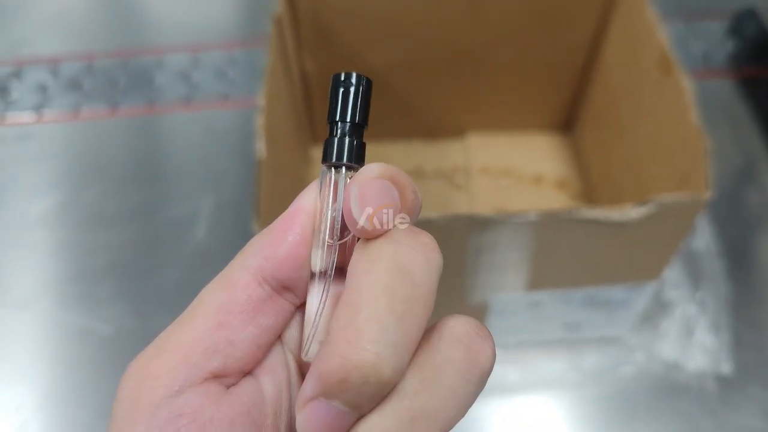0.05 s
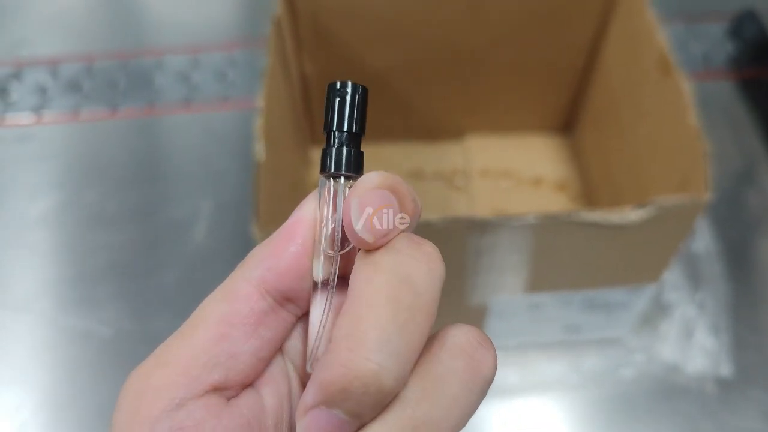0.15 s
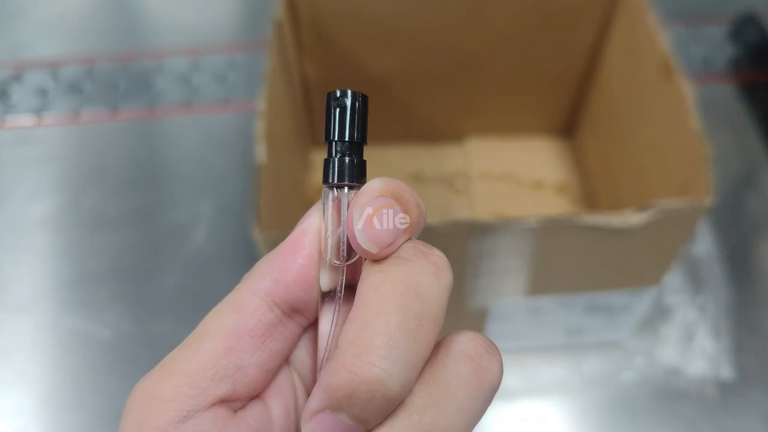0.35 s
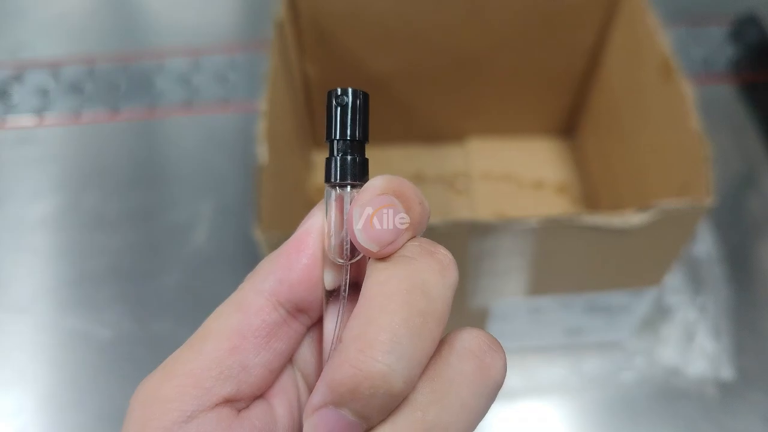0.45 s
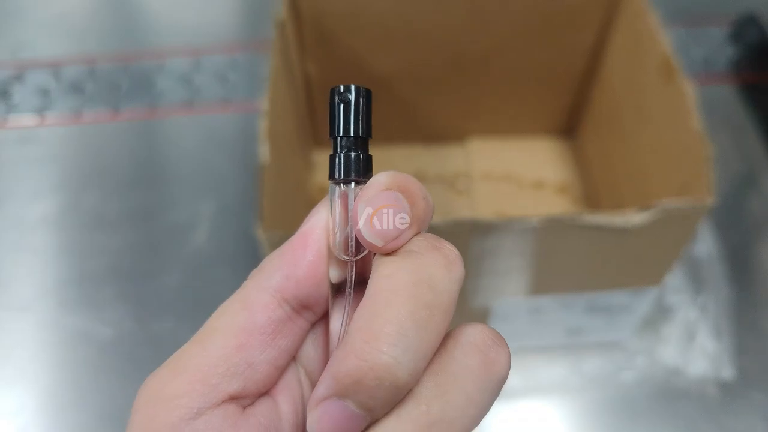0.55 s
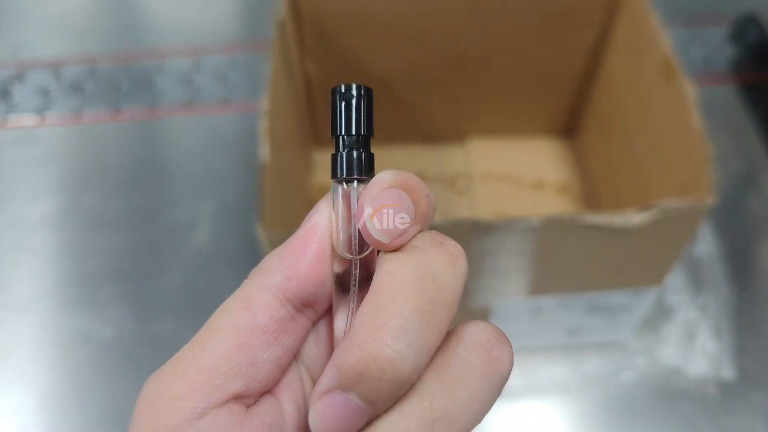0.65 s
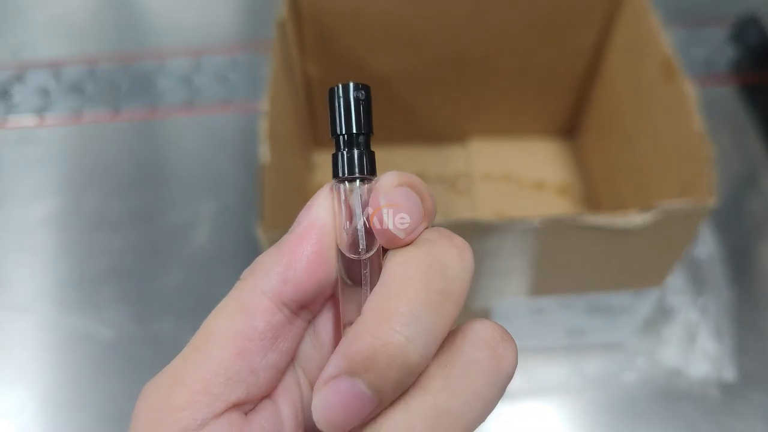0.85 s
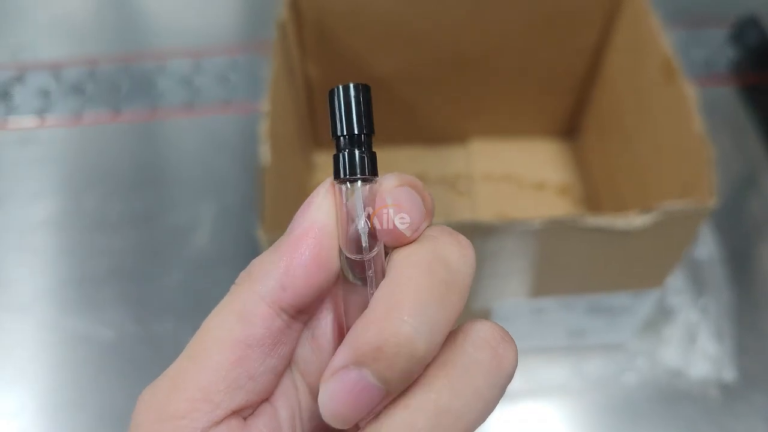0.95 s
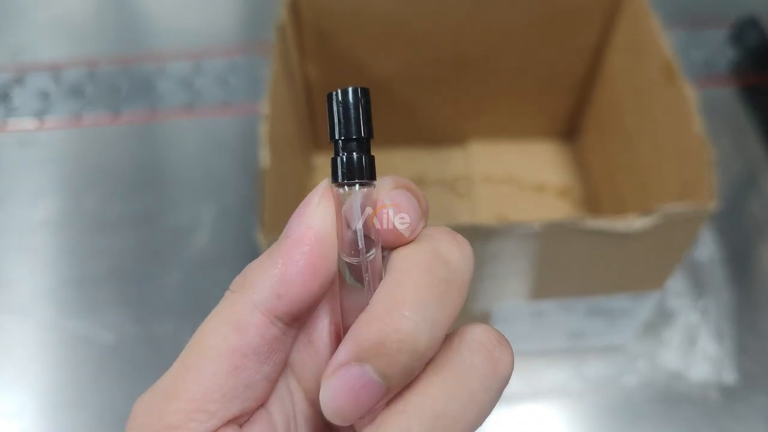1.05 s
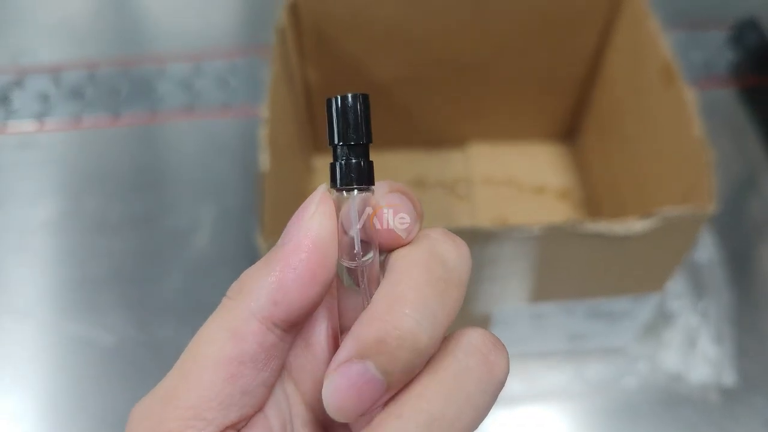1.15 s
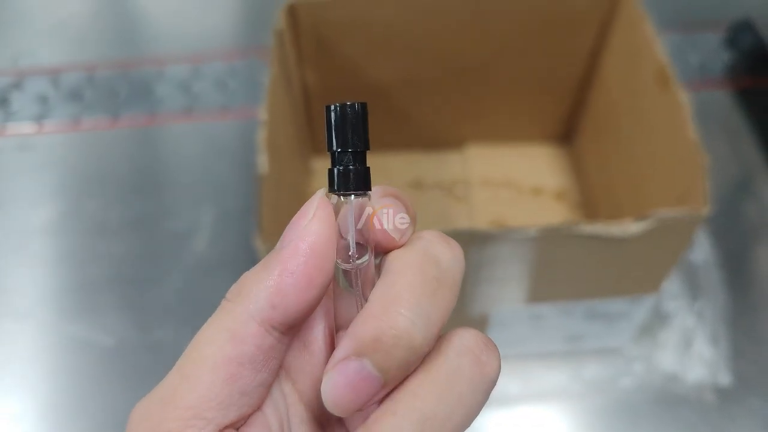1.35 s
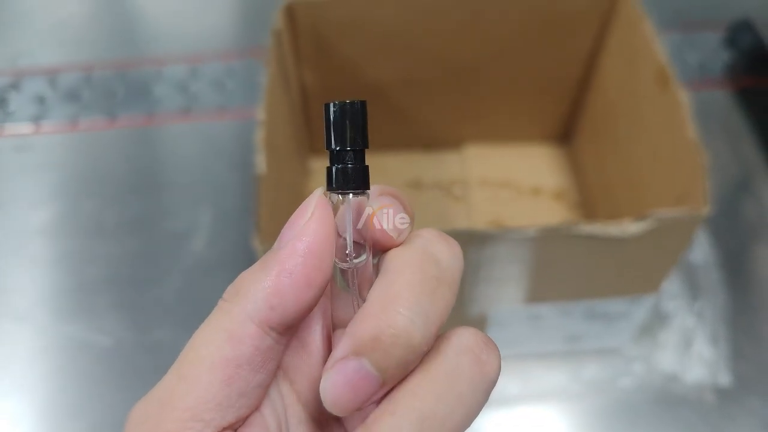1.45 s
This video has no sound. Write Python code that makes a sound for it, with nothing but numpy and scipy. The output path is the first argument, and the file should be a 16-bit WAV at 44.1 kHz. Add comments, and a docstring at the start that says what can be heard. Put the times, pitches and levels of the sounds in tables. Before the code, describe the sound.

An air-driven machine makes two quick strokes, each a thud and blast of hissing air ending in a clack, the second shorter. Heard from nearby, they ring out in a hard-walled workshop over ventilation rumble.

```python
"""A hard-walled workshop, a stereo microphone a short way from an air-driven machine.
At first there is ventilation rumble, mains hum and a faint hiss of earlier air dying in the hall.
At 0.22 s a valve spits, the piston thuds home with a blast of air, the exhaust hisses on,
and the piston clacks back. A second stroke with a shorter hiss follows at 0.51 s.
From 0.8 s the hall rings out over the rumble."""
import sys
import numpy as np
from scipy import signal
from scipy.io import wavfile

SR = 44100
rng = np.random.default_rng(int(sys.argv[2]) if len(sys.argv) > 2 else 0)


def master(y):
    """Save y as 16-bit WAV."""
    cut = np.clip(np.atleast_2d(y).T, -1, 1)
    pcm = np.round(cut * 32767)  # scale
    wavfile.write(sys.argv[1], SR, pcm.astype(np.int16))


N = 66150
T = np.arange(N) / SR

# valve strokes: (opens [s], opening time [s], blast starts [s], shuts [s],
# spit [dB], blast [dB], exhaust at shutting [dB], exhaust growth until then [dB])
VALVE_STROKES = [(0.2215, 0.011, 0.24, 0.465, -27.5, -19, -30.5, 3),
                 (0.514, 0.014, .5365, 0.67, -22, -16.5, -26.5, 2)]
# colours of the escaping air: (frequency [Hz], relative level per Hz [dB])
SPIT_COLOUR = [(100, -26), (700, -1.5), (2000, -2), (5000, -0.5), (7500, -8), (9000, -9.5), (12500, 1),
               (16000, -2.5)]
BLAST_COLOUR = [(50, -34), (130, -18), (450, 7), (950, -1.5), (1900, 5.5), (2700, 0), (3300, 3.5),
                (5500, 3.5), (7500, 2.5), (8700, -8), (12000, -1.5), (16000, -9.5)]
EXHAUST_COLOUR = [(50, 12.5), (150, 7.5), (500, 8.5), (1000, -4), (1900, 3.5), (3200, 3), (5500, 2.5),
                  (7600, -4.5), (8700, -8), (11500, 0), (16000, -5.5)]
# direction of the air at the microphone: (frequency [Hz], left minus right [dB])
SPIT_EXHAUST_BALANCE = [(200, -1), (1500, -2), (5000, 0.5), (9000, -13), (15000, 0)]
BLAST_BALANCE = [(200, -7), (1300, 0), (5000, -4.5), (15000, -10)]
# whistling resonances of the outlet: (frequency [Hz], width [Hz], level against the hiss [dB])
OUTLET_MODES = [(1500, 20, -18), (1930, 40, -11), (2720, 73, -4), (3240, 57, -7), (5940, 17, -5),
                (6720, 25, -1.5), (6810, 67, 3.5), (7576, 550, 5.5)]
# piston knocks, relative levels: (time [s], thud [dB], thud pitch [Hz], thud t60 [s],
# clack [dB], clack centre [Hz], ping [dB], shudder [dB])
PISTON_KNOCKS = [(0.1212, -59, 500, 0.0088, -60, 2300, -56, -61.5),
                 (0.2394, -7.5, 277, 0.019, -19, 2000, -19.5, -31),
                 (0.2452, -16, 401, 0.027, -23, 1000, -28, -27),
                 (0.4407, -27.5, 464, 0.035, -23, 1850, -24, -42),
                 (0.4512, -23, 420, 0.065, -26, 584, -50.5, -25),
                 (0.4553, -26.5, 224.5, 0.13, -40, 600, -45, -38),
                 (0.5237, -13, 271, 0.015, -26, 600, -36, -26),
                 (0.5337, -12, 154.2, .095, -24, 2310, -24, -29),
                 (0.5367, -14.5, 427, .018, -27, 520, -24, -26),
                 (0.7499, -24, 345, 0.021, -23.5, 1040, -44, -29.5),
                 (0.7599, -38, 247.2, 0.034, -28, 1005, -52, -38),
                 (0.7861, -30.5, 296, 0.078, -53, 900, -60, -38)]
# modes of the machine frame and the steel end stop: (frequency [Hz], relative level [dB], t60 [s])
FRAME_MODES = [(123, -15.5, 0.29), (162.2, -19.5, 0.28)]
END_STOP_MODES = [(852, -8, 0.054), (1475, -16.5, 0.077), (1916, -5, 0.034), (3190, -1, 0.045),
                  (4015, -4.5, 0.034)]
# rattling panels: (frequency [Hz], relative level per Hz [dB])
PANEL_COLOUR = [(60, -14), (130, 7.5), (240, 5.5), (330, -2), (430, 0.5), (600, 2), (900, -10), (3000, -47)]
# first reflections and hall tail at the microphone: (frequency [Hz], relative level [dB])
NEAR_WALL_LEVELS = [(150, -18.5), (600, -4.5), (1200, -4.5), (3000, -5.5), (12000, -5)]
TAIL_LEVELS = [(100, -9.5), (500, -6), (2000, -2), (7500, 0), (9500, -2.5), (16000, -3.5)]
# decay of the hall: (frequency [Hz], t60 [s])
TAIL_T60 = [(100, 0.5), (500, 1.14), (2000, 1.66), (5000, 1.3146), (7700, 0.96), (10000, 0.78),
            (16000, 0.32)]
# likeness of the microphone's two channels: (frequency [Hz], correlation [0 to 1])
CHANNEL_LIKENESS = [(60, 0.96), (180, 0.97), (520, 0.54), (1300, 0), (16000, 0)]
# lingering air and ventilation: (frequency [Hz], relative level per Hz [dB])
LINGERING_COLOUR = [(500, 0.5), (1100, -4), (3000, -1.5), (5000, -8), (7800, -4), (8800, -17), (16000, -27)]
VENT_COLOUR = [(25, -10), (45, -5), (70, -9), (125, -1), (215, -3.5), (290, -11.5), (410, -11.5),
               (560, -20.5), (800, -25.5), (1200, -34.5), (2000, -37), (3000, -35.5), (5000, -44),
               (7600, -42.5), (8700, -59), (16000, -46)]
# faint electrical whines: (frequency [Hz], level [dB])
ELECTRIC_WHINES = [(8000, -71), (10000, -74)]

SPIT_S, SHUT_S, EXHAUST_RISE_S, FLUTTER_DB = 0.037, 0.013, 0.021, 0.54
BLAST_RISE_S, BLAST_DECAY_S = 0.0095, 0.019
CLACK_RISE_S, CLACK_DECAY_S, CLACK_EDGE_RATIO = 0.0016, 0.0024, 2.17
SHUDDER_RISE_S, SHUDDER_DECAY_S = 0.0045, 0.018
THUD_SOFT_HZ, STOP_SCATTER_DB, LOOSE_PAN_DB = 900, 3, 1
HALL_BUILD_S, LINGERING_DB, LINGERING_DECAY_S = 0.0086, -53.5, 0.47
VENT_DB, HUM_HZ, HUM_DB = -38, 117.5, -44
CUTOFF_HZ = 15900
SIDES = np.array([[.5], [-.5]])  # splits a level difference between left and right


def air():
    """Compressed air spits from the valve, blasts and hisses on, whistling in the outlet."""
    spit, blast, exhaust = 0, 0, 0
    for opens, opening_s, hit, shuts, spit_db, blast_db, exhaust_db, growth_db in VALVE_STROKES:
        spit += from_db(spit_db) * envelope(opens, opening_s, opens + SPIT_S, SHUT_S)
        blast += from_db(blast_db) * burst(hit, BLAST_RISE_S, BLAST_DECAY_S)
        swell_db = growth_db * np.clip((T - shuts) / (shuts - opens), -1, 0)
        exhaust += from_db(exhaust_db + swell_db) * envelope(hit, EXHAUST_RISE_S, shuts, SHUT_S)
    jet = spit * coloured(SPIT_COLOUR, SPIT_EXHAUST_BALANCE)
    jet += blast * coloured(BLAST_COLOUR, BLAST_BALANCE)
    jet += exhaust * coloured(EXHAUST_COLOUR, SPIT_EXHAUST_BALANCE)
    jet *= from_db(FLUTTER_DB * drift(40))
    whistles = sum(from_db(db) * butter(jet, [hz - width / 2, hz + width / 2], "band", order=1)
                   for hz, width, db in OUTLET_MODES)
    return jet + whistles


def piston():
    """Each knock thuds, rings the frame and steel stop, clacks loose parts and shakes the panels."""
    blows, thuds, clacks, pings, shudder = 0, 0, 0, 0, 0
    for time, thud_db, thud_hz, thud_t60, clack_db, clack_hz, ping_db, shudder_db in PISTON_KNOCKS:
        click = (np.arange(N) == int(time * SR)).astype(float)
        blows += from_db(thud_db) * click
        thuds += from_db(thud_db) * ring(click, thud_hz, thud_t60)
        clack_band = [clack_hz / CLACK_EDGE_RATIO, clack_hz * CLACK_EDGE_RATIO]
        rattle = rms_one(butter(rng.standard_normal((2, N)), clack_band, "band"))
        clacks += from_db(clack_db) * rattle * burst(time, CLACK_RISE_S, CLACK_DECAY_S)
        for hz, db, t60 in END_STOP_MODES:  # each blow shares its strength differently among the modes
            scatter_db = STOP_SCATTER_DB * rng.standard_normal((2, 1))
            pings += from_db(ping_db + db + scatter_db) * ring(click, hz, t60)
        shudder += from_db(shudder_db) * burst(time, SHUDDER_RISE_S, SHUDDER_DECAY_S)
    frame = sum(from_db(db) * ring(blows, hz, t60) for hz, db, t60 in FRAME_MODES)
    body = butter(2 * thuds + frame, THUD_SOFT_HZ, "low")
    loose = (clacks + shudder * coloured(PANEL_COLOUR)) * from_db(LOOSE_PAN_DB * SIDES)
    return loose + pings + butter(body, hz=88, kind="high")


def hall(x):
    """Nearby surfaces answer first, then comes a long tail that dies soonest in the high treble."""
    response = 0
    for hz, band in noise_bands():
        near = envelope(start=0.00363, rise_s=0.00071, end=0.0029, decay_s=0.002)
        tail = np.clip(T / HALL_BUILD_S, 0, 1) * from_db(-60 * T / at_hz(TAIL_T60, hz))
        near_power = from_db(2 * at_hz(NEAR_WALL_LEVELS, hz)) * near ** 2 / np.sum(near ** 2)
        tail_power = from_db(2 * at_hz(TAIL_LEVELS, hz)) * tail ** 2 / np.sum(tail ** 2)
        response += band * np.sqrt(near_power + tail_power)
    return signal.fftconvolve(x, response, axes=1)[:, :N]


def lingering_air():
    """A faint hiss of earlier air, still dying away in the hall at the start."""
    return from_db(LINGERING_DB) * np.exp(-T / LINGERING_DECAY_S) * coloured(LINGERING_COLOUR)


def room_tone():
    """Steady ventilation rumble, a wavering mains hum and thin electrical whines that swell and fade."""
    hum = np.sqrt(2) * np.sin(2 * np.pi * HUM_HZ * T) * (1 + 0.092 * drift(5))
    whine = sum(from_db(db + 1.1 * drift(4)) * np.sin(2 * np.pi * hz * T + 0.61 * drift(30))
                for hz, db in ELECTRIC_WHINES)
    return from_db(VENT_DB) * coloured(VENT_COLOUR) + from_db(HUM_DB) * hum + whine


def noise_bands():
    """Narrow bands of stereo noise, alike in the bass and unrelated in the treble."""
    edges = np.geomspace(22, 17500, 48)
    white = rng.standard_normal((2, 2, N + SR // 4))
    for k, (low, high) in enumerate(zip(edges, edges[1:])):
        mid, side = butter(white[k % 2], [low, high], "band")[:, -N:]
        hz = np.sqrt(low * high)
        alike = at_hz(CHANNEL_LIKENESS, hz)
        yield hz, (np.sqrt(1 + alike) * mid + np.sqrt(1 - alike) * side * [[1], [-1]]) / np.sqrt(2)


def coloured(spectrum, pan=None):
    """Stereo noise of a given colour and direction, rms 1."""
    return rms_one(sum(band * from_db(at_hz(spectrum, hz) + (SIDES * at_hz(pan, hz) if pan else 0))
                       for hz, band in noise_bands()))


def envelope(start, rise_s, end, decay_s):
    """Linear attack from the start, exponential release from the end."""
    return np.clip((T - start) / rise_s, 0, 1) * np.exp(-np.maximum(T - end, 0) / decay_s)


def burst(start, rise_s, decay_s):
    """An envelope that falls as soon as it has risen."""
    return envelope(start, rise_s, start + rise_s, decay_s)


def ring(x, hz, t60):
    """A unit click sets a sine of height 1 ringing."""
    radius, angle = from_db(-60 / (t60 * SR)), 2 * np.pi * hz / SR
    return signal.lfilter([0, np.sin(angle)], [1, -2 * radius * np.cos(angle), radius ** 2], x + 1e-18)


def drift(rate_hz):
    """Slow random wander, rms 1."""
    return rms_one(butter(rng.standard_normal(2 * N), rate_hz, "low")[N:])


def butter(x, hz, kind, order=2):
    """Causal Butterworth filter, corners no lower than 10 Hz."""
    sections = signal.butter(order, np.clip(hz, 10, .45 * SR), kind, fs=SR, output="sos")
    return signal.sosfilt(sections, x + 1e-18)


def at_hz(points, hz):
    """Read a table on a log-frequency axis."""
    frequencies, values = np.transpose(points)
    return np.interp(np.log(hz), np.log(frequencies), values)


def from_db(db):
    """Decibels to gain."""
    return 10 ** (np.asarray(db) / 20)


def rms_one(x):
    """Scale to rms 1."""
    return x / np.sqrt(np.mean(x ** 2) + 1e-20)


def scene():
    """At the microphone: the machine direct, the hall around it, the room tone behind."""
    machine = air() + piston()
    return machine + hall(machine) + lingering_air() + room_tone()


def record(dry):
    """The microphone chain rounds the peaks and cuts the top."""
    rounded = .8 * np.tanh(dry / .8)
    return signal.sosfilt(signal.ellip(12, .1, 80, CUTOFF_HZ, fs=SR, output="sos"), rounded)


dry = scene()
out = record(dry)
master(out)
```